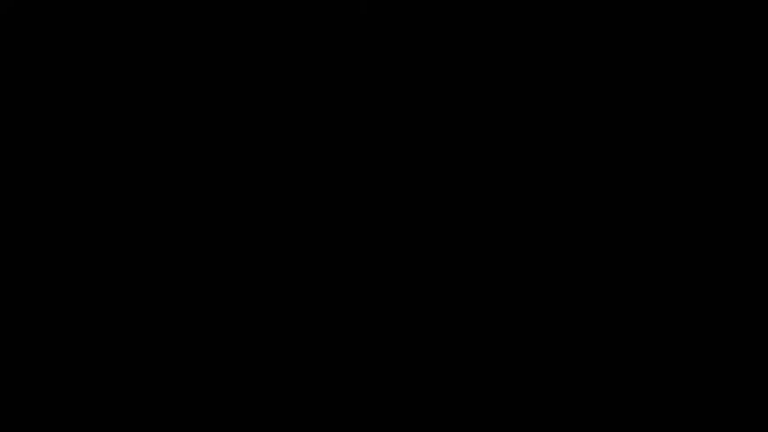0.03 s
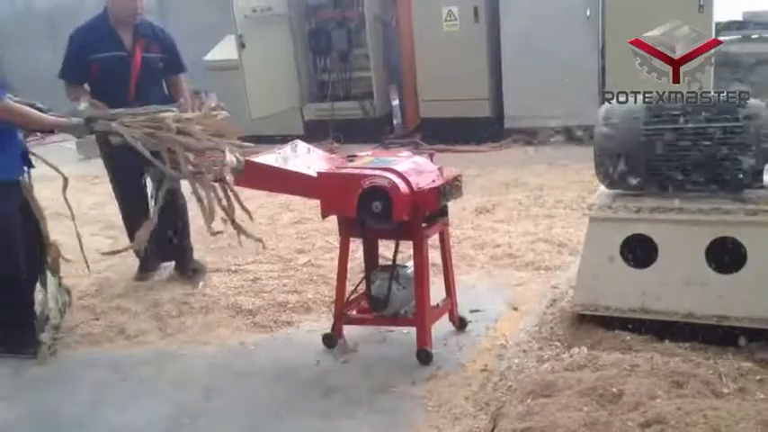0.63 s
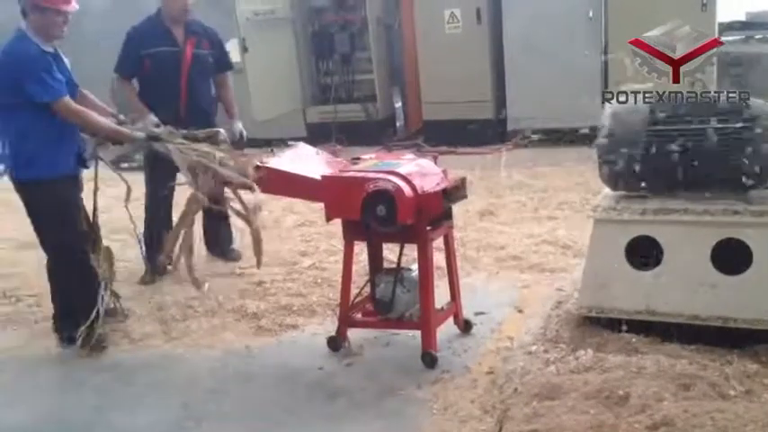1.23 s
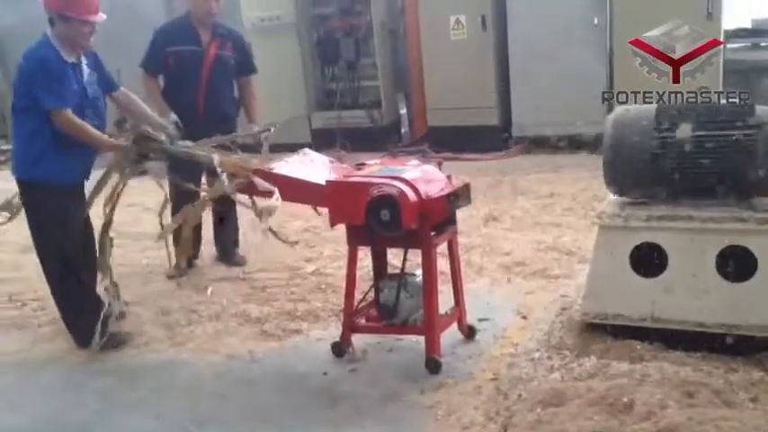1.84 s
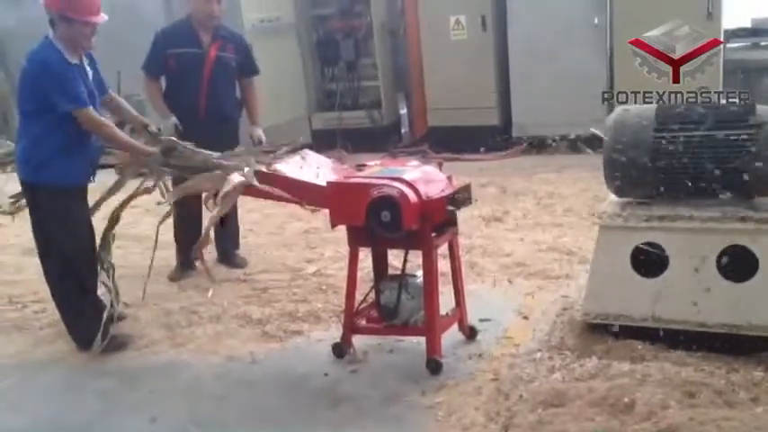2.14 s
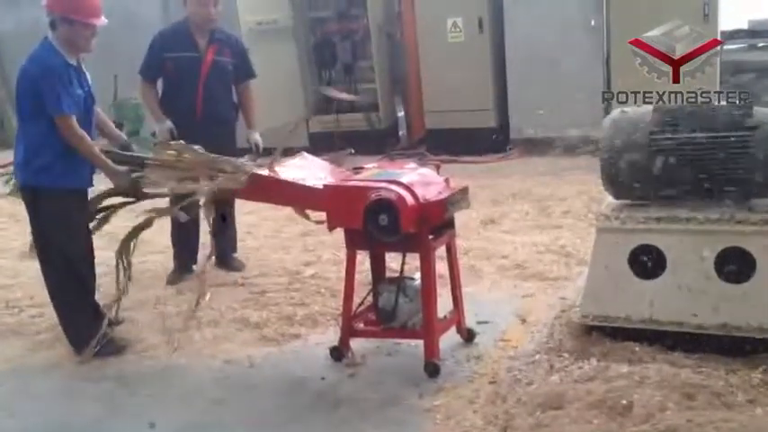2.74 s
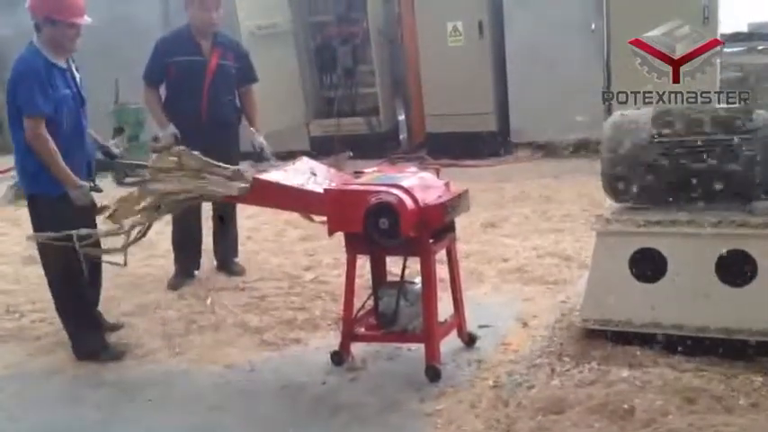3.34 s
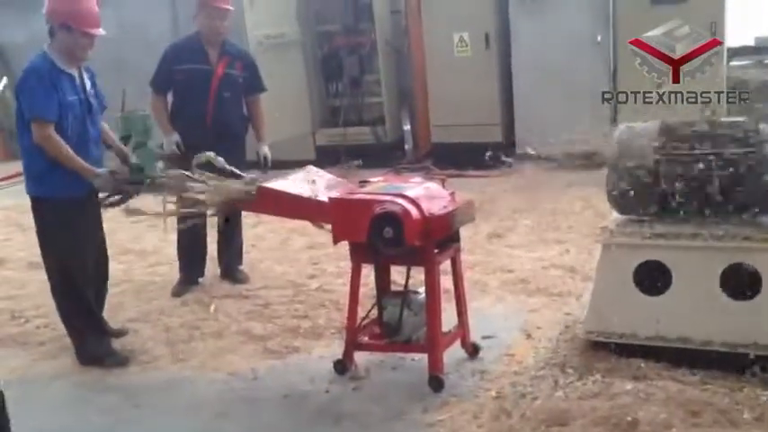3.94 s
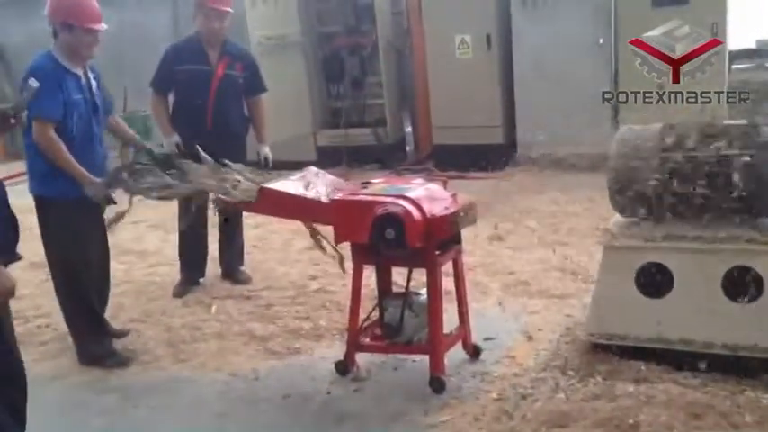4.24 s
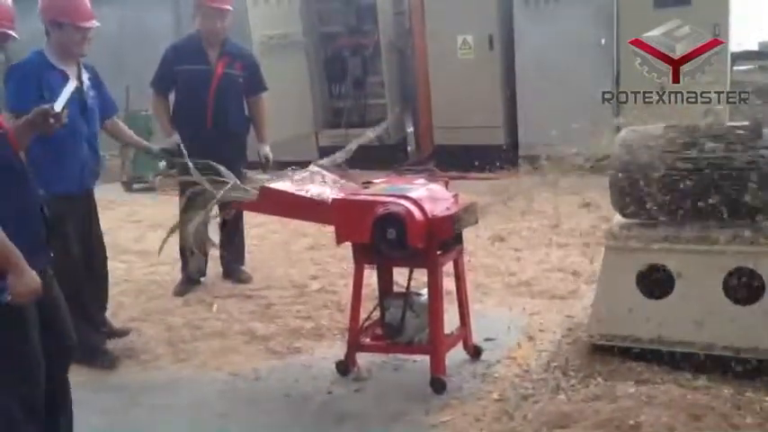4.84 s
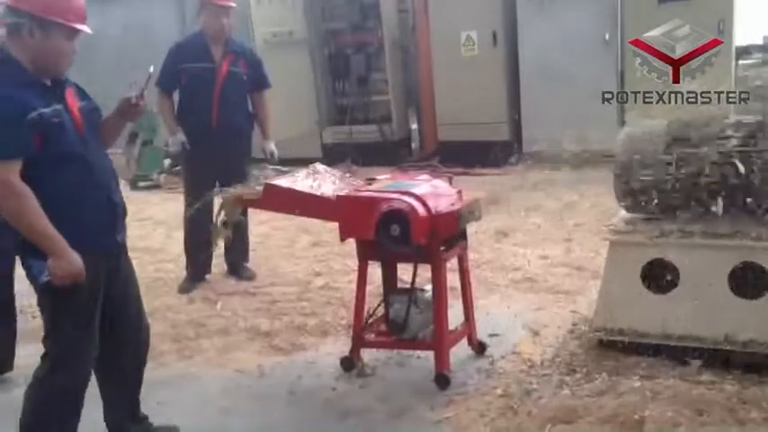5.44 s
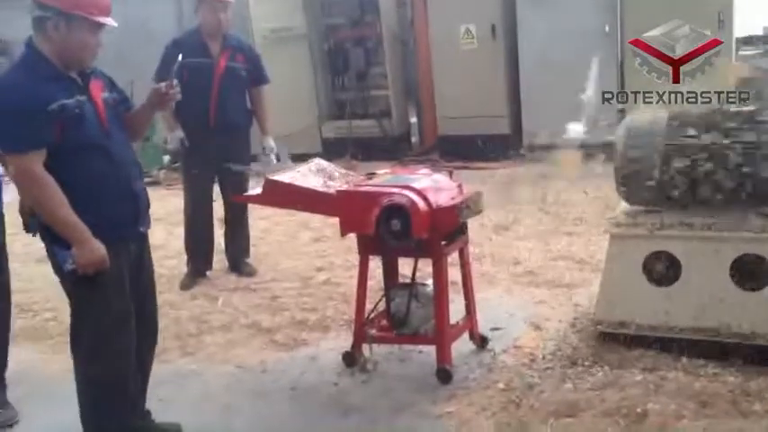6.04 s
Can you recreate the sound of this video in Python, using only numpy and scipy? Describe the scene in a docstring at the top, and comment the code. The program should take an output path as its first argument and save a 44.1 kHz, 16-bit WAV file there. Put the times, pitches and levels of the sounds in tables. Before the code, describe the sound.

The loud whirr and crunch of a chopping machine cuts in and keeps going, heard from a few steps away in a walled yard with faint echo. Dry leaves and stalks shred in a rapid, continuous rasp, with scattered cracks and bits drumming on a metal hood. In the second half, tougher stems scrape through, crunching harder and making the machine hum more heavily.

```python
"""A loud whirr and crunch cuts in: a small electric chaff cutter is chopping dry maize stalks.
Two knives on a fast rotor cut about 75 times a second, tearing leaves and snapping stalks.
The cut pieces (chaff) rattle round the steel hood and make it ring. After a stretch of loose leaves
come thick stems, which scrape through and make the frame drone. A walled yard adds a faint echo."""
import sys
import numpy as np
from scipy import signal
from scipy.fft import rfft, irfft
from scipy.io import wavfile
from scipy.ndimage import uniform_filter1d

SR = 44100
rng = np.random.default_rng(int(sys.argv[2]) if len(sys.argv) > 2 else 0)


def unload_wav(signal):
    """Save mono or channel-first audio to the path in sys.argv[1] as 16-bit WAV at rate SR, clipped to [-1, 1]."""
    wavfile.write(
        sys.argv[1],
        SR,
        np.round(np.clip(np.atleast_2d(signal).T, -1, 1) * 32767).astype(np.int16),
    )


N = 273420
TIME = np.arange(N) / SR

# how often a knife passes; the rotor sags when the knives take more: (time [s], rate [Hz])
KNIFE_RATE = [(.14, 73.9), (.5, 75.35), (.8, 75.0), (1.6, 75.3), (2.25, 75.35), (2.7, 74.4), (3.05, 74.4),
              (3.5, 74.72), (3.75, 73.94), (4.0, 74.0), (4.25, 74.58), (4.8, 73.9), (5.5, 74.24),
              (5.8, 74.28), (6.2, 74.74)]
# how hard the knives work, about 0 in leaves and 1 in thick stems: (time [s], load [no unit])
KNIFE_LOAD = [(.15, 0.77), (.8, 1.3), (1.3, -0.49), (2.3, -0.58), (2.6, -0.39), (3.5, -0.21), (3.9, 1.6),
              (4.3, 0.87), (4.55, 0.91), (4.8, 0.87), (5.2, 0.28), (5.52, 0.81), (5.74, 1.5), (5.9, 1),
              (6.05, 0.25), (6.2, 0.78)]
# how much of the bundle goes in, against the usual: (time [s], feed [dB])
FEED_LEVEL = [(.15, -0.5), (1.15, -0.5), (1.35, -0.6), (2.1, -0.8), (2.33, -2.5), (2.42, -1.5), (2.9, 1.5),
              (3.17, -2.1), (3.52, 0), (3.7, 0.5), (3.9, 0), (4.05, -1), (4.2, -1.5), (4.4, 0.3), (4.6, .5),
              (4.95, 0.7), (5.15, 0.5), (5.3, 0.5), (5.47, 0), (5.7, 0.2), (5.87, 0.3), (6.05, -1),
              (6.2, -2.5)]
# the feed changes briefly between stalks, nearly always dipping: (time [s], length [s], change [dB])
FEED_GAPS = [(.33, .075, -2.5), (1.332, .03, -1.5), (2.26, .035, -3.5), (3.5, 0.045, -2),
             (3.963, 0.039, -2), (4.302, 0.082, -1.5), (4.666, 0.027, -2.5), (5.15, 0.035, -1.5),
             (5.305, .03, -3), (5.377, .03, -4), (5.53, .03, 1)]
# bites into a stalk or clump: (time [s], length [s], extra tearing [dB], extra crackle [dB])
BITES = [(0.195, 0.11, 1.5, 0), (0.376, 0.018, -0.5, 1), (0.47, 0.089, 3, 1), (0.83, 0.036, 3.5, 0),
         (0.96, 0.14, 2.5, 2.5), (1.087, 0.045, 2.5, 1.5), (1.168, .012, -1, 3.5), (1.218, .018, 1.5, 2),
         (1.426, .018, 0.5, 2), (1.776, 0.032, 0.5, 3), (2.208, .04, 1.5, 1), (2.37, 0.13, 2.5, 4),
         (2.55, 0.12, 2.5, 1.5), (2.69, .04, 1, -0.5), (2.976, 0.046, 3, -0.5), (3.075, 0.023, 4, -1),
         (3.262, .015, 2, -4), (3.533, 0.023, 3, -4), (3.613, 0.099, 1, 2.5), (3.765, 0.042, 2, 0),
         (4.096, 0.07, 2, 1), (4.257, 0.031, 1.5, 3.5), (4.49, 0.27, 1, 1), (4.72, 0.013, -1.5, -3),
         (4.874, 0.056, 1.5, 1.5), (5.354, 0.018, 2.5, -1), (5.428, .02, 1, 3), (5.584, .02, 0.5, -1),
         (5.745, 0.1, 1, 1.5), (5.977, .02, 1.5, -4)]
# a dry stalk snaps: (time [s], pitch [Hz], level [dB])
SNAPS = [(0.786, 2140, -11), (.865, 2300, -15), (2.566, 2000, -16), (2.645, 3900, -14), (2.876, 1500, -12),
         (3.112, 2200, -13), (3.480, 1700, -10), (3.830, 3600, -18), (3.925, 3700, -16), (3.962, 2070, -17),
         (4.164, 2000, -22), (4.494, 2080, -20), (4.978, 2100, -10), (5.232, 2100, -17), (5.495, 2280, -17),
         (5.870, 3800, -13)]
# very short, bright clicks: (time [s], level [dB])
TICKS = [(2.644, -5), (3.019, -8), (3.559, -7.5), (4.774, -7), (5.419, -8)]
# a tough stem scrapes through: (time [s], length [s], pitch [Hz], level [dB])
SCRAPES = [(3.762, 0.13, 1586, -21.5), (4.043, .16, 1030, -24), (4.23, 0.096, 3110, -24),
           (4.24, 0.12, 3170, -25.5), (4.44, 0.14, 736, -22), (4.54, 0.14, 958, -25),
           (4.85, 0.13, 1526, -25), (5.01, 0.075, 2360, -24), (5.14, 0.11, 1550, -26),
           (5.33, 0.087, 3080, -25), (5.464, 0.087, 2270, -23), (5.496, 0.13, 753, -19.5),
           (5.57, .06, 2290, -21), (5.795, .055, 2290, -18), (5.8, 0.14, 820, -21.5)]

# the colour of each noise, its mix of low and high: (frequency [Hz], relative level [dB])
TEAR_COLOUR = [(150, -36), (500, -2.5), (1000, -8.5), (1600, -4), (2250, -0.5), (2750, -1.5), (3400, 1),
               (4600, -2.5), (6000, -7.5), (8000, -21.5), (12000, -47)]
CRACKLE_COLOUR = [(1500, -51), (4000, 3), (6000, 3.5), (7300, 4), (8800, -0.5), (10200, -0.5), (11500, -5),
                  (13000, -55)]
CRUNCH_COLOUR = [(80, -89), (300, -36.5), (520, 4), (800, -2), (1200, -10), (1550, 7.5), (1900, 0.5),
                 (2300, 6), (2800, -17.5), (4000, -23)]
SPLINTER_COLOUR = [(100, -65), (600, -17), (1600, -3.5), (2200, 0.5), (2800, 2), (3700, -0.5), (5500, -9.5),
                   (8000, -8.5), (12000, -31)]
TICK_COLOUR = [(300, -35), (1500, -6), (3500, 0), (7000, -3), (11500, -8)]
HOOD_COLOUR = [(200, -37.5), (520, -17), (680, 1), (790, 2), (950, -0.5), (1070, -2), (1200, -2.5),
               (1300, -1), (1420, -6), (2000, -11.5), (4000, -50.5)]
FRAME_COLOUR = [(15, -49), (50, -63), (100, -19.5), (130, -14), (170, -5), (240, 1), (350, 1.5),
                (480, -4.5), (620, -5), (900, -20), (2000, -46.5)]

# the notes of the steel hood: (pitch [Hz], relative level [dB], time to fade by 60 dB [s])
HOOD_NOTES = [(743.5, 10, 0.11), (807, 7.5, 0.14), (956, 11, 0.21), (1120, 10, 0.042), (1200, 9.5, 0.17),
              (1253, 2, 0.067), (1285, 1.5, 0.23), (1567, 4, 0.091)]
# the rotor's tones: (pitch [times the knife rate], level in leaves [dB], level in stems [dB])
WHIRR_TONES = [(9, -35, -35), (10, -33, -31), (10.5, -38, -42), (11, -32.5, -34), (12, -40, -38),
               (13, -40, -40), (14, -39, -38), (15, -32, -34), (17, -36, -39), (18, -43, -43),
               (19, -44, -41), (22, -45, -46), (23, -43, -45), (24, -45, -47), (27, -43, -47),
               (30.5, -42, -44)]
# a thin whine and the frame's four hums: (pitch [times the knife rate], relative level [dB])
WHINE = [(16, 0), (21, -4)]
BASS, BODY, DRONE, GROWL = [(2, 0), (1, -19)], [(3, 0)], [(5, 0), (4, -.5)], [(6, -1), (7, -1.5), (8, -6)]

# how each part swells and sinks: (time [s], level [dB])
CHAFF_LEVEL = [(.15, -21), (.4, -20.5), (.55, -21.5), (.7, -22), (1.15, -22), (1.35, -22.5), (1.8, -23),
               (2.33, -26.5), (2.45, -18), (3.35, -19), (3.68, -16.5), (4.35, -20.5), (4.6, -18),
               (5.87, -18.5), (6.05, -23), (6.2, -23)]  # chaff beats on the hood
CLANG_LEVEL = [(.15, -21.5), (.5, -28), (.7, -39), (.87, -23), (1.2, -35), (2.33, -52), (2.53, -22.5),
               (2.88, -21), (3.1, -44), (3.4, -33), (3.75, -23), (4.1, -25.5), (4.4, -34), (4.65, -31),
               (5.7, -25.5), (6.2, -35)]  # hard pieces ring the hood's high notes
BUZZ_LEVEL = [(.15, -33), (.9, -38), (1.6, -45), (2.25, -38), (2.45, -29.5), (2.75, -27), (3.05, -28.5),
              (3.45, -28.5), (3.65, -26.5), (4.15, -35), (4.4, -31), (5.0, -34), (5.8, -31), (6.2, -42)]  # the bundle presses on the hood's panels
WHINE_LEVEL = [(.15, -32), (1.0, -29.5), (1.3, -34), (2.3, -48), (2.55, -30), (3.1, -36), (3.7, -27),
               (4.1, -40), (4.75, -30.5), (5.7, -34), (6.2, -35)]
BASS_LEVEL = [(.15, -48), (1.3, -48.5), (1.7, -36.5), (2.25, -49), (2.48, -50), (2.6, -34), (3.2, -41.5),
              (3.9, -48), (4.3, -34), (4.6, -48), (5.1, -36), (5.7, -40), (5.9, -32.5), (6.2, -42)]
BODY_LEVEL = [(.15, -25.5), (.6, -35), (.75, -24.5), (1.02, -37), (1.4, -41), (1.6, -30), (1.95, -40.5),
              (2.15, -30), (2.5, -29.5), (2.8, -35), (3.3, -31), (3.88, -34.5), (4.35, -23.5), (4.7, -30.5),
              (5.2, -33.5), (5.57, -23), (5.72, -29.5), (5.87, -22.5), (6.0, -28), (6.15, -25)]
DRONE_LEVEL = [(.15, -41), (1.4, -37.5), (2.6, -31), (3.0, -33.5), (3.45, -43), (3.75, -29), (4.3, -23),
               (4.8, -24.5), (5.05, -25), (5.22, -20.5), (5.58, -26), (5.75, -19.5), (5.9, -19),
               (6.07, -35), (6.2, -32)]
GROWL_LEVEL = [(.15, -40), (3.6, -37), (3.95, -27), (4.45, -31.5), (4.75, -29.5), (4.95, -26.5), (5.2, -25),
               (5.38, -35), (5.75, -29), (6.2, -38)]

TEARING, CRACKLING = 2, 3  # columns of BITES
USUAL_BUZZ_DB, USUAL_CHAFF_DB = -34, -19


def shredding(passes, feed_db):
    """Each knife tears a burst of dry fibres; the brittle leaves crackle highest."""
    cuts = strokes(passes, fall=.6, floor=3, uneven_db=7)
    tear = colour(clicks(20000, spread_db=1) * cuts, TEAR_COLOUR)
    tear = patchy(tear, depth_db=3.5, frames=22, bands=3)
    bursts = strokes(passes, fall=.36, floor=1, uneven_db=-.5) * amp(.84 * wander(24.2))
    crackle = colour(clicks(20000, spread_db=.5) * bursts, CRACKLE_COLOUR)
    crackle = patchy(crackle, depth_db=2, frames=12, bands=8)
    tear_db = -18.5 + feed_db + biting(TEARING)
    crackle_db = -23.5 + .19 * feed_db + biting(CRACKLING)
    return tear * amp(tear_db) + crackle * amp(crackle_db)


def hood(passes, clang_from_hz=1040, flex_s=.0002):
    """Cut pieces drum on the hood in uneven gusts and make its steel ring briefly."""
    chaff = clicks(9000, spread_db=1.5) * strokes(passes, fall=1, floor=1, uneven_db=8.5)
    t = np.arange(SR // 4) / SR
    low_ring, clang = np.zeros((2, N))
    for hz, db, fade_s in HOOD_NOTES:
        note = amp(db - 60 * t / fade_s) * np.sin(2 * np.pi * hz * t)
        ring = signal.oaconvolve(clicks(500, spread_db=.5), note)[:N]
        ring = np.interp(TIME + flex_s * wander(6), TIME, ring)  # the hood flexes, so the pitch wavers
        if hz < clang_from_hz:
            low_ring += ring
        else:
            clang += ring
    chaff_db = curve(CHAFF_LEVEL) + .89 * biting(TEARING) + .8 * wander(30)
    drumming = amp(-2.5) * colour(chaff, HOOD_COLOUR) + amp(-11) * unit(low_ring)
    return drumming * amp(chaff_db) + unit(clang) * amp(curve(CLANG_LEVEL))


def stems(passes, feed_db):
    """Thick, pithy stems give a woody crunch at each cut."""
    cuts = clicks(9000, spread_db=1.2) * strokes(passes, fall=.3, floor=.5, uneven_db=3.5)
    crunch = patchy(colour(cuts, CRUNCH_COLOUR), depth_db=11, frames=20, bands=2)
    return crunch * amp(-29 + 5.5 * curve(KNIFE_LOAD) + feed_db + .87 * biting(TEARING))


def splinters(passes, feed_db):
    """Hard stalk skin splinters at each cut, most when the feed is heavy."""
    cuts = strokes(passes, fall=.45, floor=.1, uneven_db=5)
    skin = colour(clicks(12000, spread_db=0) * cuts, SPLINTER_COLOUR)
    skin = patchy(skin, depth_db=9.5, frames=8, bands=8)
    return skin * amp(-27 + 4.5 * feed_db + 2 * curve(KNIFE_LOAD))


def snaps(rise_s=.001, fall_s=.007, width_octaves=.62):
    """A stalk's fibres give way all at once, in a crack that stands out of the shredding."""
    t, out = np.arange(SR // 25) / SR, np.zeros(N)
    shape = np.minimum(t / rise_s, 1) * np.exp(-np.maximum(t - rise_s, 0) / fall_s)
    for start, hz, db in SNAPS:
        octaves_away = np.log2((np.fft.rfftfreq(len(t), 1 / SR) + 1) / hz)
        fibres = soft_noise(len(t), damping=(octaves_away / width_octaves) ** 4)
        out[round(start * SR):][:len(t)] += amp(db) * fibres * shape
    return out


def ticks(fall_s=.0012):
    """Very short, bright clicks poke out of the noise and stop dead."""
    t, bursts = np.arange(SR // 100) / SR, np.zeros(N)
    for start, db in TICKS:
        bursts[round(start * SR):][:len(t)] += amp(db) * np.exp(-t / fall_s)
    return bursts * colour(rng.standard_normal(N), TICK_COLOUR)


def scrapes(waver_hz=24, shake_db=4.5):
    """A tough stem sticks and slips on the steel, making it sing one unsteady note."""
    drift_hz = waver_hz * wander(93)
    shake = unit(amp(shake_db * wander(60)))
    out = np.zeros(N)
    for start, length, hz, db in SCRAPES:
        note = np.sqrt(2) * np.sin(2 * np.pi * np.cumsum(hz + drift_hz) / SR)
        out += amp(db) * note * swell(start, length)
    return out * shake


def rotor(passes):
    """The spinning knives whirr and whine, the frame hums and the hood's panels buzz."""
    load, buzz_db = curve(KNIFE_LOAD), curve(BUZZ_LEVEL)
    whirr = sum(amp(leaf_db + load * (stem_db - leaf_db)) * tone(passes, multiple, .45, .55, shake_hz=9)
                for multiple, leaf_db, stem_db in WHIRR_TONES)
    whirr_db = -.5 + .49 * (buzz_db - USUAL_BUZZ_DB) + .24 * (curve(CHAFF_LEVEL) - USUAL_CHAFF_DB)
    whine = chord(passes, WHINE, WHINE_LEVEL, waver=.35, slip=.45)
    hums = [(BASS, BASS_LEVEL), (BODY, BODY_LEVEL), (DRONE, DRONE_LEVEL), (GROWL, GROWL_LEVEL)]
    hum = sum(chord(passes, tones, level, waver=.17, slip=.18) for tones, level in hums)
    buzz = tone(passes, 9 / 2, waver=.25, slip=.35)  # nine times per turn of the two-knife rotor
    flutter_db = 1.6 * wander(21)  # the stems shake the hum
    return whirr * amp(whirr_db) + whine + hum * amp(flutter_db) + buzz * amp(buzz_db)


def knocks(passes):
    """Every cut jolts the frame with a dull, uneven knock, harder under load."""
    blows = clicks(9000, spread_db=0) * strokes(passes, fall=.17, floor=.65, uneven_db=5)
    level_db = -26 + .5 * curve(KNIFE_LOAD) + .082 * (curve(CHAFF_LEVEL) - USUAL_CHAFF_DB)
    return colour(blows, FRAME_COLOUR) * amp(level_db + 1.9 * wander(14))


def yard(x, echo_db, fade_s):
    """The ground and the walls scatter back a short, weak echo."""
    t = np.arange(SR // 3) / SR
    echoes = rng.standard_normal(len(t)) * (rng.random(len(t)) < 2000 / SR)
    echoes *= (t > .004) * amp(-60 * t / fade_s)
    return x + amp(echo_db) * signal.oaconvolve(x, echoes / np.linalg.norm(echoes))[:N]


def strokes(passes, fall, floor, uneven_db):
    """Each knife strikes at once and fades towards a steady floor; no two cuts are alike."""
    strength = amp(uneven_db * rng.uniform(-1, 1, 1000)[passes.astype(int)])
    return floor + strength * np.exp(-(passes % 1) / fall)


def biting(column, rise_s=.014, fall_s=.036):
    """Extra dB from the bites: each builds up, holds while the stalk passes, and dies away."""
    return sum(bite[column] * np.clip((TIME - bite[0]) / rise_s, 0, 1)
               * np.exp(-np.maximum(TIME - bite[0] - bite[1], 0) / fall_s) for bite in BITES)


def clicks(per_s, spread_db):
    """Random clicks; more spread makes their sizes more unequal."""
    size = amp(spread_db * np.minimum(rng.exponential(1, N), 4))
    return unit(size * rng.standard_normal(N) * (rng.random(N) < per_s / SR))


def patchy(x, depth_db, frames, bands):
    """The noise's colour shifts in brief random patches, mostly dips; frames and bands set their size."""
    spectrum = signal.stft(x, nperseg=256)[2]
    patches = uniform_filter1d(rng.standard_normal(spectrum.shape), bands, 0)
    patches = unit(uniform_filter1d(patches, frames, 1))
    patches = np.minimum(patches, .5 * np.tanh(2 * patches))  # boosts stay small, dips can be deep
    return unit(signal.istft(spectrum * amp(depth_db * patches), nperseg=256)[1][:N])


def chord(passes, tones, level, waver, slip):
    """A few tones that swell and sink together."""
    return amp(curve(level)) * sum(amp(db) * tone(passes, multiple, waver, slip) for multiple, db in tones)


def tone(passes, multiple, waver, slip, shake_hz=12):
    """A multiple of the knife rate; the passing crop shakes its size (waver) and timing (slip)."""
    t = np.arange(0, N / SR + .01, .002)
    damping = (np.fft.rfftfreq(len(t), t[1]) / shake_hz) ** 2
    size, lag = soft_noise(len(t), damping), soft_noise(len(t), damping)
    angle = 2 * np.pi * (multiple * passes + rng.random()) + slip * np.interp(TIME, t, lag)
    return np.sqrt(2) * np.interp(TIME, t, 1 + waver * size) * np.cos(angle)


def colour(x, table):
    """Gives a sound the table's mix of low and high, at strength 1; clicks keep their sharp starts."""
    hz, db = np.transpose(table)
    f = abs(np.fft.fftfreq(4096, 1 / SR))
    log_gain = np.log(amp(np.interp(np.log(f + 1), np.log(hz), db)))
    response = np.fft.ifft(np.exp(np.conj(signal.hilbert(log_gain)))).real
    return unit(signal.oaconvolve(x, response[:len(response) // 2])[:N])


def soft_noise(length, damping):
    """Noise of strength 1, with each frequency turned down by its damping."""
    return unit(irfft(rfft(rng.standard_normal(length)) / (1 + damping), length))


def wander(hz):
    """A random drift of strength 1, mostly slower than hz."""
    return soft_noise(N, damping=(np.fft.rfftfreq(N, 1 / SR) / hz) ** 2)


def swell(start, length):
    """One smooth rise and fall."""
    return np.sin(np.pi * np.clip((TIME - start) / length, 0, 1))


def curve(rows):
    """Joins the rows of a table by straight lines in time."""
    return np.interp(TIME, *np.transpose(rows))


def amp(db):
    """Turns decibels into a gain."""
    return 10 ** (np.asarray(db) / 20)


def unit(x):
    """Scales to an average strength (rms) of 1."""
    return x / np.sqrt(np.mean(x ** 2) + 1e-20)


def scene():
    """The running cutter, a few steps away in the yard."""
    knife_hz = curve(KNIFE_RATE) * (1 + .0018 * wander(7.8))
    passes = np.cumsum(knife_hz) / SR  # counts the knives going by
    gaps_db = sum(db * swell(start, length) for start, length, db in FEED_GAPS)
    feed_db = curve(FEED_LEVEL) + gaps_db + .21 * wander(30)  # the bundle is lumpy
    chopping = knocks(passes) + hood(passes) + stems(passes, feed_db) + shredding(passes, feed_db)
    chopping += splinters(passes, feed_db) + snaps() + ticks() + scrapes()
    return (yard(chopping, echo_db=-20.5, fade_s=.091) + rotor(passes))[None]


def record(dry, start_s=.1424, top_hz=11700):
    """The sound cuts in, its tallest peaks are rounded off, and the highest treble is removed."""
    opened = dry * np.clip((TIME - start_s) / .0022, 0, 1)
    rounded = opened / (1 + opened ** 6) ** (1 / 6)
    treble_cut = signal.firwin(301, top_hz, window=("kaiser", 8), fs=SR)
    return signal.oaconvolve(rounded, treble_cut[None], "same")


dry = scene()
out = record(dry)
unload_wav(out)
```